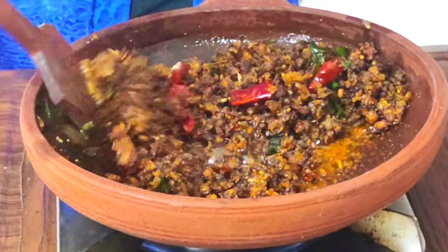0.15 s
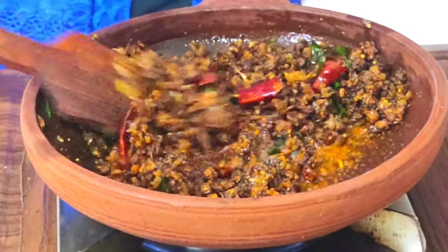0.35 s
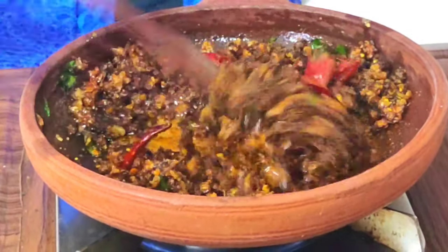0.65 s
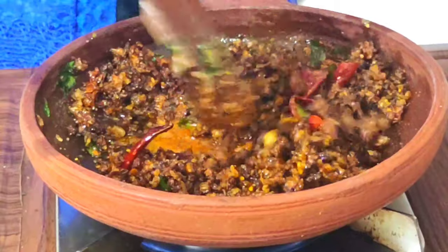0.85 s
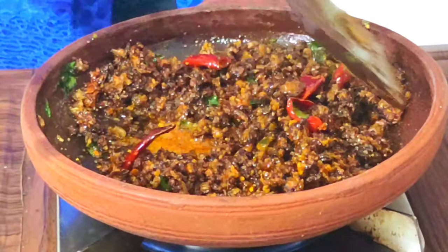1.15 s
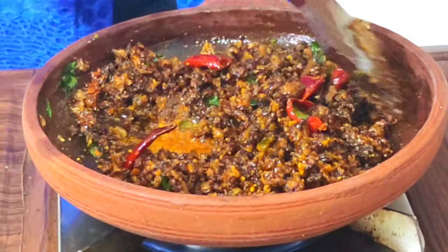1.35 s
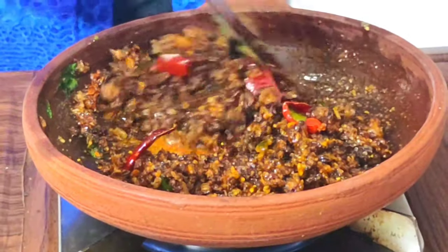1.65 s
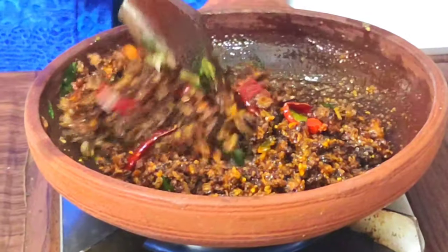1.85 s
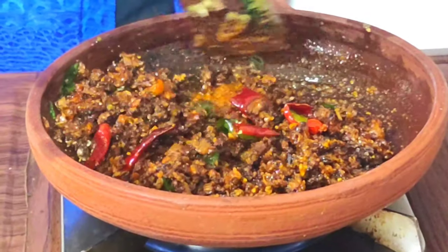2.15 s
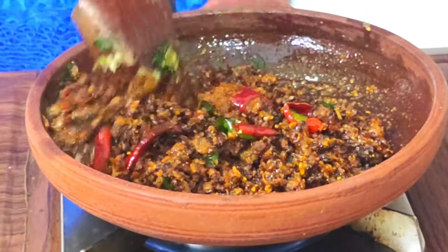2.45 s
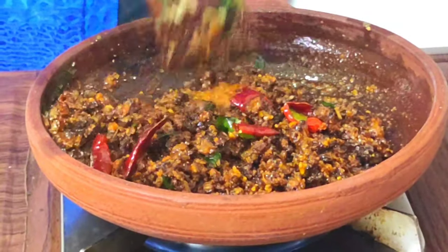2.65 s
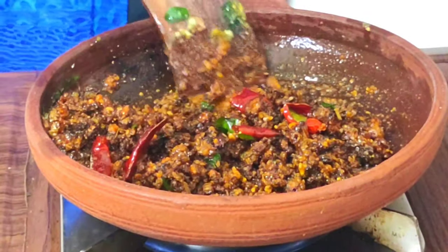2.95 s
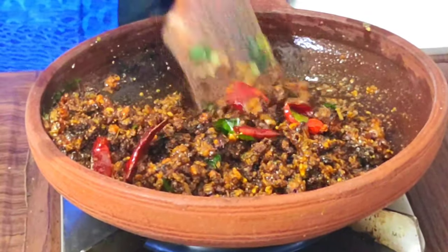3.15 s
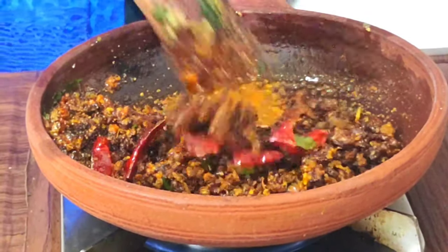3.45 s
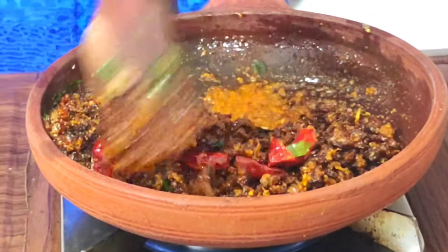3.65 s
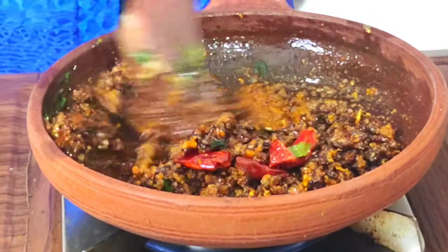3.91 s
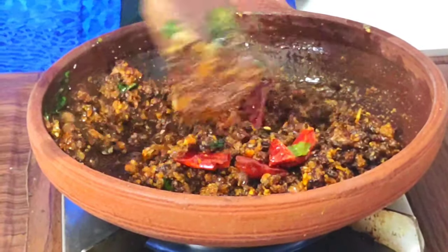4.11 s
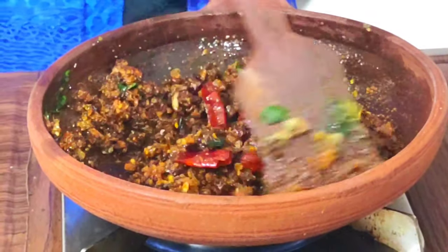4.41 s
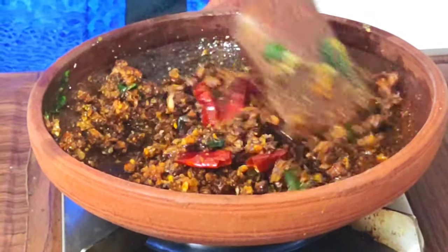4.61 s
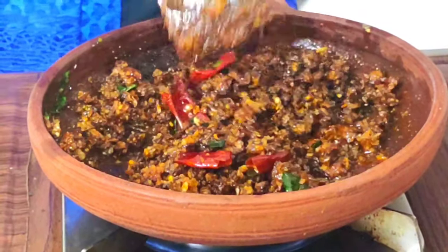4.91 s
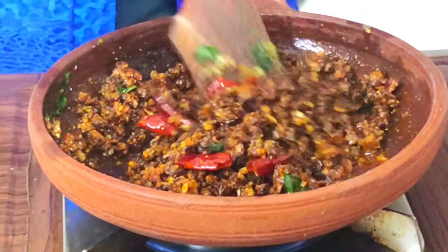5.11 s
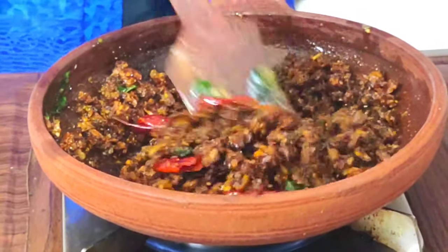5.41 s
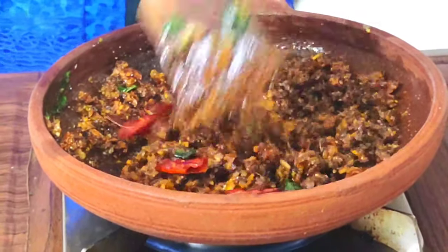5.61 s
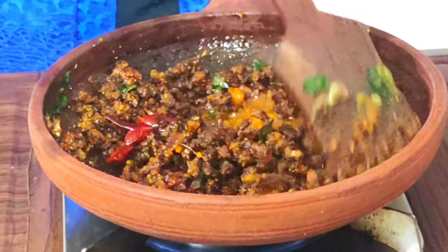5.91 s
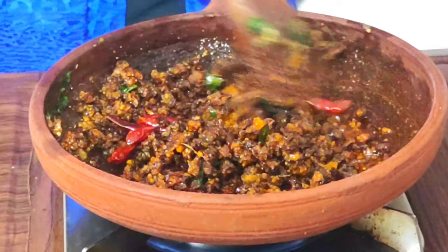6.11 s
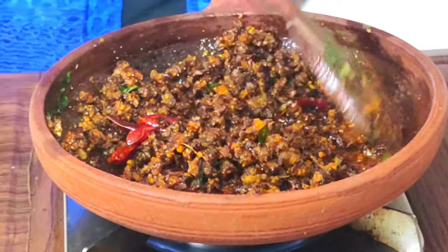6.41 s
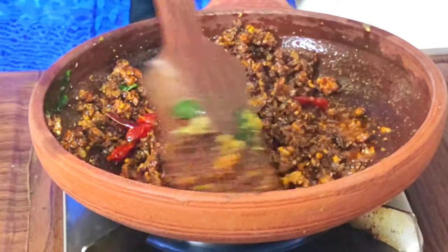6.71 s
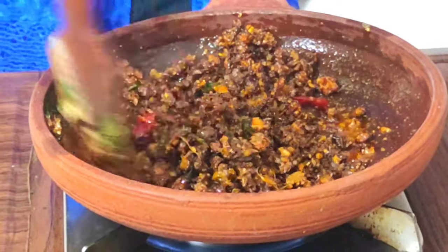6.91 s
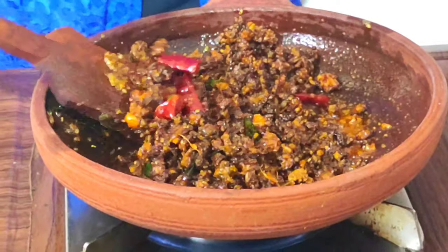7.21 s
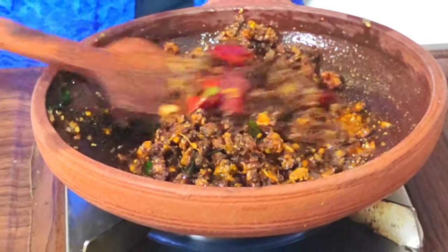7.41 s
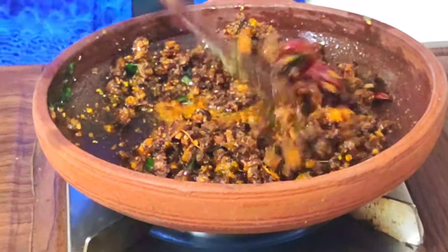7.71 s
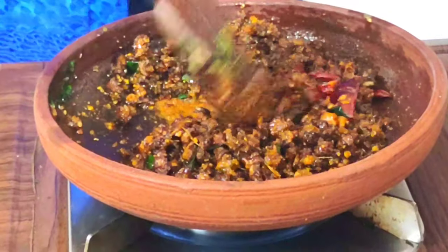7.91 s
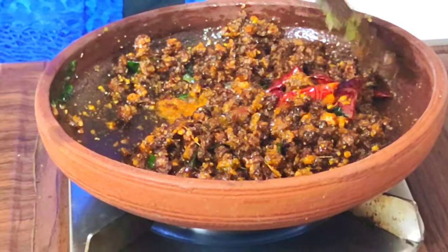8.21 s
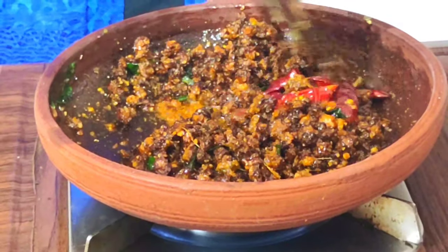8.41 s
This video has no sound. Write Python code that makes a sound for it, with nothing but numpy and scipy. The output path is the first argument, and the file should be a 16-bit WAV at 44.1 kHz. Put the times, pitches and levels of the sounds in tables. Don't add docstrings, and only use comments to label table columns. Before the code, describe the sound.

Irregular wooden stirring in a clay pot: hollow thumps, gritty juddering scrapes and wet squelches, with soft frying and crisp oil pops.

```python
import sys
import numpy as np
from scipy import signal
from scipy.fft import rfft, irfft, next_fast_len
from scipy.io import wavfile
from scipy.ndimage import uniform_filter1d

SR = 44100
rng = np.random.default_rng(int(sys.argv[2]) if len(sys.argv) > 2 else 0)


def invert_db(x):
    u = np.asarray(x, float) / 20
    return 10 ** u


def waveform_to_disk(signal):
    frames = np.transpose(np.atleast_2d(signal))
    scaled = np.clip(frames, -1, 1) * 32767
    samples = np.round(scaled).astype(np.int16)
    wavfile.write(sys.argv[1], SR, samples)


N = 377182
STEP_S = 0.001
LEAD_S = 0.028

# pitch_hz, level_db, t60_s
POT_MODES = [(178, -6.5, 0.059), (210, -0.5, 0.062), (233.6, 0.5, 0.093), (250, -13.5, 0.15),
             (290, 1.5, 0.13), (325, -4.5, 0.068), (356, 3.5, 0.2), (378, -6.5, 0.12), (405.5, -1.5, 0.15),
             (441.7, -9, 0.15), (479, -6.5, 0.062)]
# pitch_hz, level_db, t60_s
WALL_MODES = [(517, 6, 0.0055), (600.4, 2, 0.043), (611.8, 0.5, 0.047), (724, -5, 0.034),
              (820, -7.5, 0.024), (933, -7, 0.061), (978, -5.5, 0.02), (1164, -0.5, 0.017),
              (1177, 0.5, 0.025), (1250, -24, 0.014), (1564, -20, 0.019)]
# pitch_hz, level_db, t60_s
STOVE_MODES = [(61, -18, 0.059), (85.3, -3.5, 0.084), (107, 4.5, 0.19), (130, -9.5, 0.13), (162, 1, 0.081)]
# pitch_hz, level_db, t60_s
BLADE_MODES = [(1260, 9, 0.013), (1540, 8, 0.029), (1700, 6, 0.018), (1878, 3.5, 0.016), (2128, 4.5, 0.026),
               (2270, 4.5, 0.021), (2620, 4, 0.017), (2910, 4.5, 0.01), (3200, 7.5, 0.011),
               (3700, -14, .01), (4400, -6, .008)]

# frequency_hz, density_db
SIZZLE_SPECTRUM = [(12, -37), (20, -8), (42, 2), (104, 4), (291, -1.5), (508, -9), (887, -9), (1420, -12),
                   (2290, -10), (3990, -7), (6240, -13.5), (8720, -11), (11500, -16.5), (14400, -51),
                   (15700, -42)]
# frequency_hz, correlation
SIZZLE_LIKENESS = [(60, -0.19), (240, 0.042), (950, 0.14), (3770, 0.093), (15000, -0.0053)]
# start_s, drag_db, fade_db_per_s, pot_pitch_hz, wall_grit_db
LANDINGS = [
    (0.0, -21.5, 60, 307, -6.5),
    (1.372, -15, 420, 304, -6),
    (2.296, -15, 194, 345, -15),
    (2.853, -23.5, 150, 333, -9.5),
    (3.814, -22.5, 170, 380, -1),
    (6.026, -18.5, 150, 302, -16),
    (6.487, -17, 252, 357, -9),
    (8.308, -18.5, 220, 308, -12.5),
]
# middle_s, half_length_s, drag_db, pot_pitch_hz, wall_grit_db
PUSHES = [(0.342, 0.044, -43, 267, -16), (0.544, 0.04, -32, 235, -11.5), (1.517, 0.037, -16.5, 313, -15.5),
          (1.663, 0.078, -19, 305, -16), (1.791, 0.017, -27, 252, -3.5), (2.013, 0.063, -64, 318, -14),
          (2.483, 0.051, -21.5, 272, -9.5), (2.974, 0.026, -26.5, 364, -3), (3.275, 0.19, -34.5, 264, -6),
          (3.478, 0.05, -51, 335, 3), (3.998, 0.083, -37.5, 325, -4.5), (4.494, 0.033, -36, 282, -9.5),
          (4.708, 0.1, -44.5, 306, -1.5), (5.325, 0.091, -31.5, 283, -9.5), (5.693, 0.2, -45.5, 290, -3),
          (6.173, 0.058, -31, 362, -8.5), (6.695, 0.15, -41, 350, -6), (7.01, 0.023, -26.5, 333, -6),
          (7.08, 0.061, -29.5, 304, -3), (7.284, 0.061, -32, 334, -10.5), (7.478, 0.049, -28.5, 256, -11),
          (7.633, 0.084, -35, 274, -20), (8.517, 0.075, -26.5, 288, -12)]
# middle_s, half_length_s, thud_db
THUDS = [(0.377, 0.046, -38.5), (0.543, 0.049, -36), (1.41, 0.018, -37), (1.764, 0.055, -35),
         (3.24, 0.13, -38.5), (3.328, 0.038, -37), (3.856, 0.026, -30), (3.996, .05, -41),
         (5.238, 0.029, -32), (5.375, 0.046, -37.5), (7.002, 0.03, -34), (7.45, 0.042, -40),
         (7.695, 0.13, -46), (8.33, 0.021, -44), (8.505, 0.017, -39)]
# middle_s, half_length_s, rasp_db, edge_pitch_hz
RASPS = [(.14, 0.057, -47, 2600), (.23, .02, -38, 2400), (0.394, 0.029, -45, 2000),
         (0.538, 0.09, -42.5, 1930), (1.54, 0.061, -39.5, 1700), (1.778, 0.025, -44, 1700),
         (2.324, 0.0033, -19.5, 2100), (2.39, .04, -46, 2140), (2.914, 0.018, -33, 1900),
         (2.947, 0.035, -34, 1920), (3.26, 0.041, -35.5, 2150), (3.299, 0.021, -28.5, 1840),
         (3.345, 0.029, -29, 1840), (3.41, .04, -44, 1590), (3.99, 0.11, -38.5, 2500),
         (5.18, 0.05, -38, 2400), (5.27, .015, -42, 2300), (5.314, 0.022, -29, 1890),
         (5.331, .02, -30, 2650), (5.37, 0.013, -35, 2950), (5.418, 0.023, -41, 1600),
         (6.1, 0.031, -38.5, 1490), (6.536, 0.02, -37, 1530), (6.643, 0.019, -38, 3200),
         (7.016, 0.023, -34, 1480), (7.06, .06, -41.5, 3700), (7.103, 0.017, -33, 1900),
         (7.19, .05, -39, 2300), (7.526, 0.067, -38.5, 1700), (7.607, .1, -43, 2900),
         (8.352, 0.016, -40.5, 1980)]
# middle_s, half_length_s, squelch_db, fizz_db
FOLDS = [(0.079, 0.078, -32.5, -41), (0.28, 0.12, -40.5, -48), (0.61, 0.19, -46.5, -59),
         (0.756, 0.022, -44, -48), (0.85, 0.028, -46, -50), (0.972, 0.045, -50, -51),
         (1.758, 0.28, -40.5, -47), (2.118, 0.097, -47, -49.5), (2.5, 0.13, -41, -42.5),
         (2.758, 0.045, -46.5, -51), (2.917, 0.064, -42.5, -49.5), (3.252, 0.18, -43, -51),
         (3.443, 0.031, -52, -47.5), (4.01, 0.11, -40, -48), (4.765, 0.13, -43.5, -51),
         (5.2, 0.027, -48, -46), (5.263, 0.16, -42, -45), (5.745, 0.25, -49.5, -51.5),
         (5.95, 0.1, -63, -48.5), (6.088, 0.11, -41, -46.5), (6.197, 0.076, -39, -43.5),
         (6.482, 0.15, -48.5, -49), (6.65, 0.045, -43, -65), (6.755, 0.06, -47.5, -52),
         (7.075, 0.15, -40.5, -44.5), (7.58, 0.19, -42.5, -48), (8.18, 0.07, -68, -51),
         (8.51, 0.13, -46.5, -53)]
# frequency_hz, level_db
SQUELCH_SPECTRUM = [(1500, -3), (2600, 1), (3500, 1.5), (4200, 1.5), (5500, -2.5), (7000, -10), (9000, -34)]
# frequency_hz, level_db
FIZZ_SPECTRUM = [(5500, -14), (7500, -4), (8600, -4), (10000, -6), (12000, -10.5), (14000, -22),
                 (16000, -32)]
# start_s, peak_db, pitch_hz
JOLTS = [(0.033, -20, 284), (0.079, -30, 293), (0.117, -29, 304), (0.153, -22, 280), (0.214, -24, 319),
         (0.277, -24, 403), (0.311, -27, 200), (0.335, -32, 333), (0.353, -29, 208), (0.382, -26, 205),
         (1.385, -30, 288), (1.477, -11, 290), (1.489, -16, 236), (1.518, -16, 290), (1.546, -10, 290),
         (1.581, -15.5, 390), (1.643, -29, 306), (1.675, -13.5, 359), (1.709, -14.5, 228),
         (1.746, -16, 272), (1.796, -18.5, 262), (1.87, -32, 280), (2.309, -23, 343), (2.344, -23, 364),
         (2.417, -16, 357), (2.444, -17, 274), (2.495, -19, 256), (2.504, -18, 266), (2.534, -20.5, 423),
         (2.672, -34, 358.5), (2.908, -32, 303), (3.224, -27, 203.4), (3.255, -33, 215),
         (3.284, -19.5, 280), (3.828, -28, 398), (3.851, -11.5, 418), (3.875, -21, 393),
         (3.924, -14.5, 347), (4.469, -40, 298), (5.222, -29, 356), (5.25, -26, 210), (5.364, -26, 297),
         (6.029, -19, 304), (6.064, -18, 376), (6.09, -15, 330), (6.107, -16.5, 394), (6.495, -29, 320),
         (6.509, -17, 293), (6.969, -15, 295), (6.985, -18, 325), (7, -21, 348), (7.014, -15.5, 340),
         (7.084, -13.5, 357), (7.166, -18, 290), (7.233, -26, 326), (7.352, -34, 360), (7.459, -19, 227),
         (8.318, -23, 337), (8.331, -25, 307), (8.5, -17, 300), (8.515, -16, 285)]
# start_s, peak_db, pitch_hz, t60_s
HUMS = [
    (2.973, -25, 357, 0.18),
    (5.325, -26, 290, 0.078),
    (5.357, -28, 286.4, 0.08),
    (5.41, -34, 290, .12),
    (6.19, -21, 380, 0.12),
    (6.242, -27, 369, 0.11),
    (6.269, -31, 361, 0.14),
    (6.331, -35, 371, .1),
    (6.378, -34, 370, .15),
    (6.822, -38, 381, 0.16),
]
# start_s, peak_db, pitch_hz
TICKS = [(0.2156, -32, 2180), (0.8159, -43, 3210), (1.036, -36, 3270), (1.533, -31, 1650),
         (2.1045, -47, 3480), (2.8609, -19.5, 1890), (3.2409, -32, 2150), (3.2745, -25, 1850),
         (3.2993, -25, 1960), (3.3363, -29, 1910), (4.1139, -34, 2090), (4.525, -37, 2620),
         (4.7216, -37, 1980), (5.1328, -35, 2440), (5.2568, -30, 2270), (5.2825, -25, 1480),
         (5.2974, -22, 1860), (5.305, -26, 2500), (5.34, -24.5, 1580), (5.348, -31, 2880),
         (5.7187, -34, 3290), (5.9667, -34, 2330), (6.129, -31, 1410), (6.9946, -27, 1440),
         (7.03, -27, 1490), (7.2169, -31, 2200), (7.4459, -36, 2150), (7.6499, -33, 1540),
         (7.993, -38, 3300), (8.306, -41, 2200), (8.473, -37, 1660)]
# start_s, blow_db, pot_ring_db, crack_db, pot_pitch_hz
KNOCKS = [(0.04, -30, -12, -25, 307), (1.369, -28, 1, -25, 290), (2.293, -10, -6.5, -16, 356),
          (2.8525, -15, -4.5, -7, 306), (3.815, -5.5, -9, -20.5, 430), (6.017, -45, 14, -25, 298),
          (6.483, -22, 5.5, -13, 290), (6.611, -27, -1, -10, 356), (6.946, -27, 3, -26, 290),
          (8.306, -32.5, 9.5, -17, 290), (8.497, -46.5, 17, -28.5, 290)]
# start_s, peak_db, pitch_hz, t60_s
POPS = [
    (0.042, -6.5, 8600, 0.42),
    (0.0894, -28, 8800, 0.2),
    (0.2663, -13.5, 8750, 0.26),
    (0.4176, -18.5, 8700, 0.3),
    (3.422, -20, 8600, 0.15),
    (5.1756, -21, 9050, 0.49),
    (5.25, -21, 8350, 0.15),
    (7.2653, -20.5, 8700, 0.15),
    (8.192, -21, 9350, 0.22),
]
# start_s, peak_db, centre_hz, lean_to_left_db (left gains 0.5 of it, right
SPITS = [(.752, -32, 7000, -2), (.936, -33, 4500, 0), (.937, -22, 12500, 5), (1.257, -34, 10000, 11),
         (2.294, -27, 3600, 0), (2.408, -29, 3800, 0), (2.855, -28, 4200, 0), (3.159, -33, 4500, 2),
         (4.725, -28, 9800, 6), (5.198, -31, 10500, 6), (5.896, -28, 8500, -6), (6.509, -28, 9800, -1),
         (6.7635, -35, 10300, 7), (7.753, -31, 11000, 12)]

# frequency_hz, t60_s
ROOM_DECAY = [(100, 0.56), (300, 0.85), (1000, 0.57), (3000, 0.55), (9000, 0.13)]
# frequency_hz, correlation
ECHO_LIKENESS = [(100, 0.58), (350, 0.86), (700, 0.15), (1500, 0.018)]
# frequency_hz, level_db
ECHO_COLOUR = [(150, 0), (260, -2), (286, -5), (320, -2), (373, -5.5), (420, -2), (700, 0)]
# frequency_hz, left_minus_right_db
PORT_BALANCE = [(60, 1.5), (300, -1.5), (1000, -0.5), (2500, 1), (4500, 1.5), (6000, -3), (7300, -3.5),
                (8000, -3.5), (8700, 10.5), (10000, 9.5), (12000, 4), (15000, 0)]


def evened(x):
    return x / np.sqrt(np.mean(x ** 2) + 1e-20)


def read(points, hz):
    f, value = np.transpose(points)
    return np.interp(np.log(hz + 1), np.log(f + 1), value)


def coloured(x, points, share=1):
    size = next_fast_len(x.shape[-1], True)
    hz = np.fft.rfftfreq(size, 1 / SR)
    return irfft(rfft(x, size) * invert_db(share * read(points, hz)), size)[..., :x.shape[-1]]


def add(mix, s, sound):
    part = mix[..., round(s * SR):][..., :sound.shape[-1]]
    part += sound[..., :part.shape[-1]]


def swells(middle, half):
    u = abs(np.arange(0, N / SR + STEP_S, STEP_S) - np.c_[middle]) / np.c_[half]
    rounded_db, skirt_db = 5.5 * u ** 2.5, 8 * u
    return invert_db(-2 * np.minimum(rounded_db, skirt_db))


def filled(steps):
    return np.interp(np.arange(N) / SR, np.arange(len(steps)) * STEP_S, steps)


def grit(per_s, spread_db, channels=1):
    size = invert_db(spread_db * np.minimum(rng.exponential(1, (channels, N)), 5))
    happens = rng.random((channels, N)) < per_s / SR
    return evened(size * rng.standard_normal((channels, N)) * happens)


def modes_of(body):
    t = np.arange(SR // 4) / SR
    hz, db, t60 = np.transpose(body)[:, :, None]
    swell = 1 - np.exp(-t * hz / 0.5)
    h = invert_db(db - 60 * t / t60) * np.sin(2 * np.pi * hz * t) / np.sqrt(t60) * swell
    h[::2] *= -1
    return h / np.linalg.norm(h.sum(0))


def ring(body):
    return modes_of(body).sum(0)


def damped(hz, t60, rise_s):
    t = np.arange(0, min(t60, 1), 1 / SR)
    return invert_db(-60 * t / t60) * (1 - np.exp(-t / rise_s)) * np.sin(2 * np.pi * hz * t)


def favoured_db(hz, place_hz):
    return 3.5 - np.minimum(34 * abs(np.log2(hz / place_hz)), 9.0)


def sizzle():
    frames, hz = N // 128 + 5, np.fft.rfftfreq(512, 1 / SR)
    a, b, c, d, patches = rng.standard_normal((frames, 257, 5)).T
    patches = uniform_filter1d(patches, 8, 0)
    patches = evened(uniform_filter1d(patches, 24, 1))
    flicker = evened(uniform_filter1d(rng.standard_normal(frames), 12))
    same = np.clip(read(SIZZLE_LIKENESS, hz), -1, 1)[:, None]
    left = a + 1j * b
    right = same * left + np.sqrt(1 - same ** 2) * (c + 1j * d)
    z = np.array([left, right]) * invert_db(2.1 * patches + 1.3 * flicker)
    air = signal.istft(z, nperseg=512, noverlap=384)[1][:, :N]
    return invert_db(-42) * evened(coloured(air, SIZZLE_SPECTRUM))


def effort():
    s, land_db, fade, land_hz, land_grit_db = np.transpose(LANDINGS)
    middle, half, push_db, push_hz, push_grit_db = np.transpose(PUSHES)
    pushes = swells(middle - LEAD_S, half)
    after = np.arange(pushes.shape[1]) * STEP_S - np.c_[s]
    rise = np.clip(after / 0.00097, 0, 1)
    landings = rise * invert_db(-2 * np.c_[fade] * np.maximum(after, 0))
    each = np.vstack([landings, pushes]) * invert_db(2 * np.c_[np.r_[land_db, push_db]])

    rest = invert_db(2 * -58)
    drag = each.sum(0) + rest
    place_hz = (np.r_[land_hz, push_hz] @ each + 273 * rest) / drag
    wall = invert_db(2 * np.r_[land_grit_db, push_grit_db]) @ each + invert_db(2 * -58)

    middle, half, thud_db = np.transpose(THUDS)
    thuds = invert_db(2 * thud_db) @ swells(middle - LEAD_S, half)
    stove = thuds + drag * invert_db(2 * -19.5) + invert_db(2 * -57.5)

    middle, half, rasp_db, rasp_hz = np.transpose(RASPS)
    rasps = swells(middle - LEAD_S, half) * invert_db(2 * np.c_[rasp_db])
    edge = rasps.sum(0) + wall * invert_db(2 * -18) + invert_db(2 * -54.5)
    edge_hz = (rasp_hz @ rasps + 2100 * (edge - rasps.sum(0))) / edge
    return np.sqrt([drag, wall, stove, edge]), place_hz, edge_hz


def stroke():
    (drag, wall, stove, edge), place_hz, edge_hz = effort()
    out = np.zeros(N)
    slips = grit(2500, 0.93)[0]
    for (hz, _, _), h in zip(POT_MODES, modes_of(POT_MODES)):
        force = slips * filled(drag * invert_db(favoured_db(hz, place_hz)))
        out += signal.oaconvolve(force, h[:8000])[:N]

    wall_force = grit(2000, 1.77)[0] * filled(wall)
    out += signal.oaconvolve(wall_force, ring(WALL_MODES))[:N]
    stove_force = grit(600, 0.23)[0] * filled(stove)
    out += signal.oaconvolve(stove_force, ring(STOVE_MODES))[:N]

    scratch = grit(3000, 1.2)[0]
    for (hz, _, _), h in zip(BLADE_MODES, modes_of(BLADE_MODES)):
        near_db = 4.0 - np.minimum(22 * abs(np.log2(hz / edge_hz)), 14.0)
        force = scratch * filled(edge * invert_db(near_db))
        out += signal.oaconvolve(force, h[:1500])[:N]
    return out


def mash():
    middle, half, wet_db, fine_db = np.transpose(FOLDS)
    folds = swells(middle, half)
    wet = filled(np.sqrt(invert_db(2 * wet_db) @ folds + invert_db(2 * -56.5)))
    fine = filled(np.sqrt(invert_db(2 * fine_db) @ folds + invert_db(2 * -57)))
    clumps = invert_db(0.76 * evened(uniform_filter1d(rng.standard_normal((2, N)), 600)))
    snaps = (0.23 * grit(4000, 0.86) + grit(6000, 0.98, channels=2)) * clumps[0]
    bubbles = (0.5 * grit(1500, 1.6) + grit(5000, 0.9, channels=2)) * clumps[1]
    squelch = wet * evened(coloured(snaps, SQUELCH_SPECTRUM))
    return squelch + fine * evened(coloured(bubbles, FIZZ_SPECTRUM))


def catches():
    out = np.zeros(N)
    rattle = ring(WALL_MODES)[:4000]
    rattle = rattle / abs(rattle).max()
    for s, db, hz in JOLTS:
        add(out, s, invert_db(db - 1.5) * damped(hz, t60=0.055, rise_s=0.0022))
        add(out, s, invert_db(db - 18.5) * rattle)
    for s, db, hz, t60 in HUMS:
        add(out, s, invert_db(db) * damped(hz, t60, rise_s=0.003))
    for s, db, hz in TICKS:
        snap = damped(hz, t60=0.023, rise_s=0.00044)
        snap = snap + 0.42 * damped(1.1 * hz, t60=0.023, rise_s=0.0004)
        add(out, s, invert_db(db - 0.5) * snap)
    return out


def knocks():
    out, t = np.zeros(N), np.arange(600) / SR
    crack_spectrum = [(1200, 5), (2200, 2.0), (2800, 3.0), (3600, -2), (5000, -13.0), (9000, -40)]
    for s, db, ring_db, crack_db, place_hz in KNOCKS:
        hz = 950 + 2.5 * db
        u = t - 0.0013
        blow = np.cos(2 * np.pi * hz * u) * np.exp(-(u / 0.00076) ** 2)
        noise = np.diff(rng.standard_normal(601))
        crack = 2.8 * np.exp(-t / 0.011) * coloured(noise, crack_spectrum)
        low = [(f, d + favoured_db(f, place_hz), t60) for f, d, t60 in POT_MODES]
        high = [(f, d - 9 + 4.1 * rng.standard_normal(), t60) for f, d, t60 in WALL_MODES]
        add(out, s, invert_db(db) * (blow + invert_db(crack_db) * crack))
        add(out, s + 0.001, invert_db(db + ring_db + 23.0) * ring(low + high))
    return out


def pops():
    out, t = np.zeros((2, N)), np.arange(12000) / SR
    r = np.exp(-np.pi * 320 / SR)
    for s, db, hz, t60 in POPS:
        burst = rng.standard_normal((2, 12000)) * invert_db(-60 * t / max(t60, 0.01))
        tone = signal.lfilter([1 - r], [1, -2 * r * np.cos(2 * np.pi * hz / SR), r * r], burst)
        add(out, s, invert_db(db - 1.5) * tone)
    return out


def spits():
    out, t = np.zeros((2, N)), np.arange(-100, 412) / SR
    for s, db, hz, pan_db in SPITS:
        tick = rng.standard_normal(512) * np.exp(-abs(t) / 0.0013) * (t >= 0)
        tick = coloured(tick, [(hz / 5, -13), (hz, 0), (hz * 1.1, -5), (hz * 1.9, -25)])
        port_db = np.array([[0.5], [-0.2]]) * pan_db
        add(out, s + t[0], invert_db(db + 3.5 + port_db) * tick / abs(tick).max())
    return out


def kitchen(x):
    hz, t, z = signal.stft(rng.standard_normal((2, SR)), SR, nperseg=256)
    same = np.clip(read(ECHO_LIKENESS, hz), 0, 1)[:, None]
    z[1] = same * z[0] + np.sqrt(1 - same ** 2) * z[1]
    decay = invert_db(-60 * t / read(ROOM_DECAY, hz)[:, None])
    tail = signal.istft(z * decay, SR, nperseg=256)[1]
    spectrum = rfft(tail)
    lumps = abs(spectrum) + 1e-9
    evening = (uniform_filter1d(lumps, size=41) / lumps) ** 0.8
    tail = irfft(spectrum * evening, tail.shape[1])
    tail[:, SR // 2:] = 0
    tail *= np.clip((np.arange(tail.shape[1]) / SR - 0.003) / 0.0015, 0, 1)
    tail = coloured(tail / np.linalg.norm(tail[0]), ECHO_COLOUR)
    return signal.fftconvolve(x[None], tail, axes=1)[:, :N]


def scene():
    pot = invert_db(-6.0) * stroke() + knocks()
    near = catches()
    echo = invert_db(-3.0) * kitchen(pot + 0.89 * near)
    return pot + near + echo + invert_db(2.5) * mash() + pops() + spits() + sizzle()


def roll_off(x):
    return signal.sosfilt(signal.butter(12, 15780, fs=SR, output="sos"), x)


def record(dry):
    hiss = invert_db(-56) * np.diff(rng.standard_normal((2, N + 1)))
    heard = np.array([np.roll(dry[0], 2), dry[1]]) + hiss
    heard = coloured(heard, PORT_BALANCE, share=np.array([[0.5], [-0.5]]))
    return roll_off(heard)


dry = scene()
out = record(dry)
waveform_to_disk(out)
```